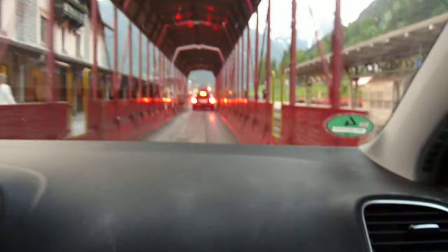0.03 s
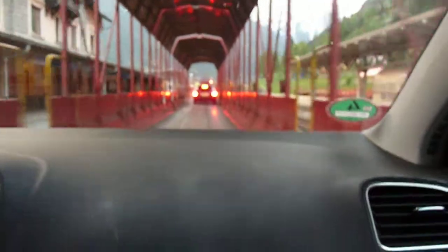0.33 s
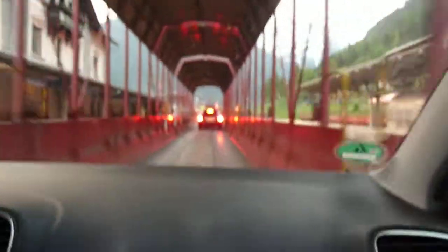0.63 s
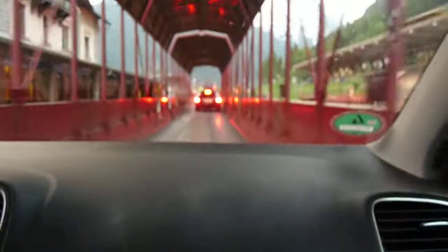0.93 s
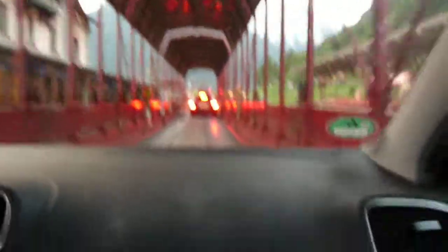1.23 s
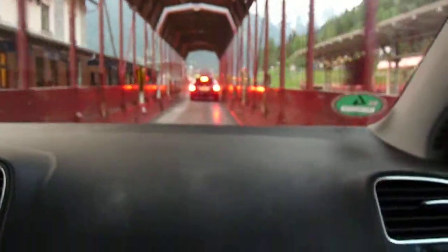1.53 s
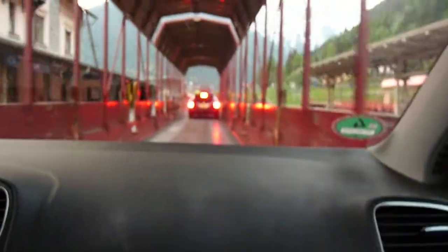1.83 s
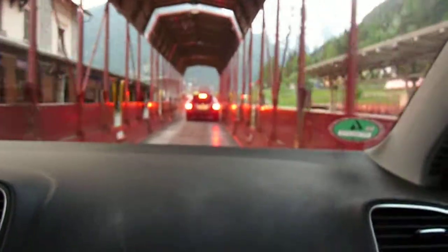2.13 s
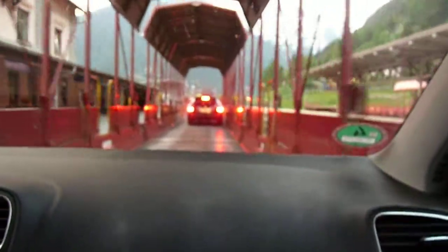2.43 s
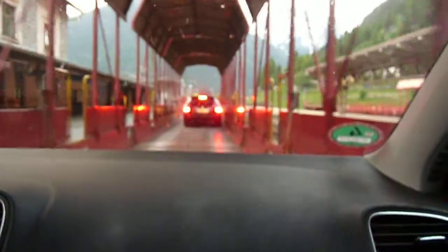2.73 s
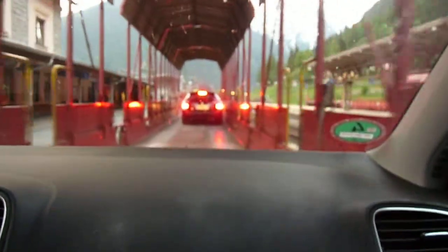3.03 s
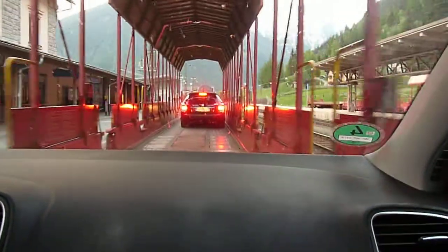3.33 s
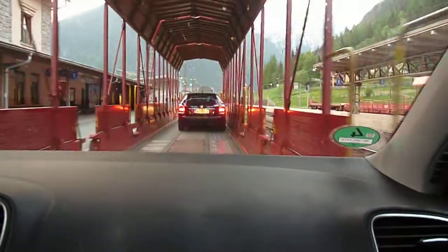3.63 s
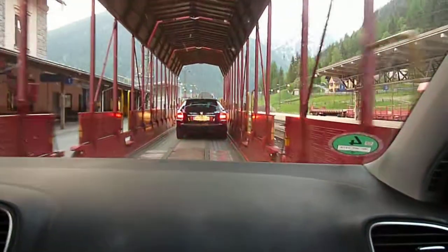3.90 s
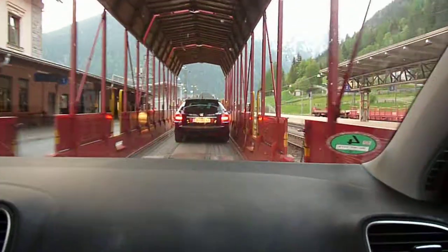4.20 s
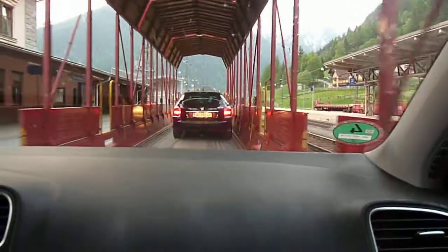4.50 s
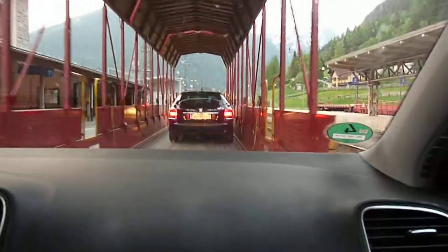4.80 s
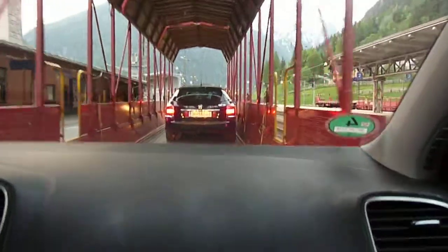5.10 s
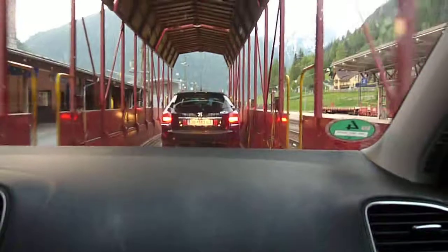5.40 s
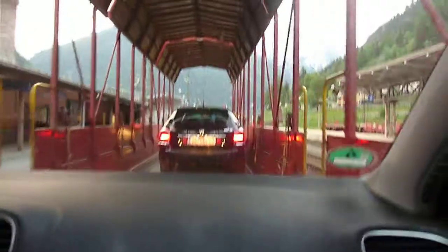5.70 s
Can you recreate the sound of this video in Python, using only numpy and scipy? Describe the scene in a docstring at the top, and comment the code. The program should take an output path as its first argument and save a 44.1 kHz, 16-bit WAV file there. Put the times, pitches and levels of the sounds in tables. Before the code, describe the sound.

A car rolls slowly along the steel deck of a rail wagon, heard from the front seat with the cabin closed. Loose plates clank and the tyres thump over joints at the start. A calmer stretch follows, with low rumble, tyre roar and a muffled engine hum that sinks and briefly booms. Then the clanking and thumping return, along with two hollow underbody knocks and a short, bright jangle.

```python
"""Inside the closed cabin of a car rolling slowly along the steel deck of a car-carrying train.
The uneven deck rocks the body and rumbles through the suspension. The engine sinks in speed and
booms as its firing rate passes the air resonance of the cabin. Tyres thump over the joints and the
underbody knocks. Up front in the mix, loose deck plates clank and chatter, and a fitting jangles."""
import sys
import numpy as np
from scipy import signal
from scipy.fft import rfft, irfft
from scipy.io import wavfile

SR = 44100
rng = np.random.default_rng(int(sys.argv[2]) if len(sys.argv) > 2 else 0)


def wav_record(signal):
    """Record a signal, one row per channel, as 16-bit PCM in the file named by sys.argv[1]."""
    frames = np.transpose(np.atleast_2d(signal))
    bounded = np.clip(frames, -1, 1)
    # unit amplitude maps onto the largest positive 16-bit level
    quanta = np.round(bounded * 32767).astype(np.int16)
    wavfile.write(sys.argv[1], SR, quanta)


N = 253575
TIME = np.arange(N) / SR


def amp(db):
    """Decibels to gain."""
    return 10 ** (np.asarray(db) / 20)


def unit(x):
    """Scales to rms 1."""
    return x / np.sqrt(np.mean(x ** 2) + 1e-20)


def at_level(x, db, size=2000):
    """Sets the rms of the first 45 ms of a blow."""
    return x * amp(db) / np.sqrt(np.mean(x[:size] ** 2) + 1e-20)


def at_hz(points, hz):
    """Reads a table on a log-frequency axis."""
    f, value = np.transpose(points)
    return np.interp(np.log(hz + 1), np.log(f), value)


def curves(rows):
    """Turns timed rows into one automation curve per value column."""
    s, *columns = np.transpose(rows)
    return [np.interp(TIME, s, c) for c in columns]


def add(mix, s, sound):
    """Mixes a sound in at s seconds."""
    part = mix[max(round(s * SR), 0):][:len(sound)]
    part += sound[:len(part)]


def drift(hz):
    """Smooth random modulation of rms 1, rolling off above hz."""
    f = np.fft.rfftfreq(N, 1 / SR)
    return unit(irfft(rfft(rng.standard_normal(N)) * np.exp(-(f / hz) ** 2), N))


def contacts(t, decay_s, per_s, rise_s):
    """A flurry of tiny impacts that swells and dies away."""
    impacts = rng.uniform(-0.96, 1, len(t)) * (rng.random(len(t)) < per_s / SR)
    swell = (1 - np.exp(-t / max(rise_s, .001))) ** 1.5
    return impacts * swell * np.exp(-t / max(decay_s, .003))


def ringing(force, modes, t):
    """Decaying modes, each driven by the force to its own level."""
    out = np.zeros(len(t))
    for hz, db, t60 in modes:
        mode = amp(-60 * t / t60) * np.sin(2 * np.pi * hz * t)
        out += amp(db) * unit(signal.fftconvolve(force, mode)[:len(t)])
    return out


def struck(blows, modes):
    """One part, hit by short flurries, rings in its modes."""
    out, t = np.zeros(N), np.arange(SR // 2) / SR
    for s, db, decay_s in blows:
        force = contacts(t, decay_s, per_s=2600, rise_s=0.0017)
        add(out, s, at_level(ringing(force, modes, t), db))
    return out


# The boxy tone of the cabin. Each row: centre in Hz, width in Hz, boost or cut in dB.
CABIN_RESONANCES = [(50, 14, 3), (300, 35, 3), (385, 80, 6), (530, 60, -2.5), (700, 100, 6.5),
                    (1270, 120, 4.5)]
def in_cabin(x, eq, tilt_db=0, size=8192):
    """Cabin air and panels resonate on top of a source's own EQ, tilted by tilt_db per octave."""
    hz = np.abs(np.fft.fftfreq(size, 1 / SR))
    db = at_hz(eq, hz) + tilt_db * np.log2(np.clip(hz, 30, 5000) / 1000)
    db += sum(lift / (1 + (2 * (hz - f) / width) ** 2) for f, width, lift in CABIN_RESONANCES)
    minimum_phase = np.exp(signal.hilbert(np.log(amp(db))).conj())  # no ring ahead of a hit
    taps = np.fft.ifft(minimum_phase).real
    return signal.fftconvolve(x, taps[:size // 2])[:len(x)]


# Sub-bass swells at steps in the deck. Each row: start in seconds, level at the crest in dB.
SWAYS = [(.04, -30.5), (.62, -37), (1.5, -37), (5.17, -27.5), (5.569, -35)]
# Their deep tone. Each row: frequency in Hz, relative level in dB.
HEAVE_EQ = [(5, -13.5), (18, 0), (32, 1), (50, 0.5), (70, -3), (110, -22), (300, -65)]
def body_heave(bumps, steady_db=-41, crest_s=.065):
    """The body heaves steadily on its springs and sways harder after each step."""
    power = np.full(N, amp(steady_db) ** 2)
    for s, db in SWAYS:
        age = np.maximum(TIME - s, 0) / crest_s
        power += (amp(db) * age * np.exp(1 - age)) ** 2
    return np.sqrt(power) * unit(in_cabin(bumps * rng.standard_normal(N), HEAVE_EQ))


# Deck roughness. Each row: time in seconds, rumble fader in dB, tyre fader in dB.
RIDE_FADERS = [(0.0, -33, -35.5), (0.46, -37, -40), (0.8, -44, -37.5), (1.22, -42, -40),
               (1.55, -39.5, -38.5), (1.86, -37, -41), (2.53, -43.5, -41.5), (2.96, -44.5, -42),
               (3.52, -41, -43), (3.71, -42.5, -32.5), (3.99, -38.5, -37.5), (4.2, -35, -38.5),
               (4.45, -40.5, -37), (4.77, -39.5, -36.5), (5.48, -37.5, -39), (5.75, -39, -32.5)]
# Dark suspension rumble, fuller tyre roar. Each row: frequency in Hz, relative level in dB.
RUMBLE_EQ = [(30, -26.5), (70, -3.5), (115, 1), (160, -0.5), (200, -7), (260, -18.5), (400, -38.5),
             (1000, -68)]
TYRE_EQ = [(80, -18.5), (180, -0.5), (250, -6), (340, 2), (580, -2), (830, -6.5), (1120, -10), (1500, -14),
           (2200, -22), (3100, -27.5), (4200, -37), (8000, -57.5)]
def rolling(rumble_boost_db=5.0, uneven_db=0.86):
    """The bed: the uneven deck heaves the body, shakes the suspension and roars under the tread."""
    rumble_db, tyre_db = curves(RIDE_FADERS)
    bumps = amp(uneven_db * drift(hz=30))
    heave = body_heave(bumps)
    rumble = unit(in_cabin(bumps * rng.standard_normal(N), RUMBLE_EQ))
    roar = unit(in_cabin(bumps * rng.standard_normal(N), TYRE_EQ))
    return heave + amp(rumble_db + rumble_boost_db) * rumble + amp(tyre_db) * roar


# The sinking revs. Each row: time in seconds, firing rate in Hz, effort as a gain in dB.
REVS = [(0, 111.9, 5), (.6, 120, -5), (1.2, 121.6, 1.5), (1.74, 114, -3), (1.88, 109.2, 7),
        (2.08, 111, 1.5), (2.56, 103.5, 3), (2.98, 94.67, 0.5), (3.35, 85.8, -5), (3.55, 81.3, 2.5),
        (4, 74, -3), (5.75, 72.1, -4.5)]
# The muffled hum. Each row: multiple of the firing rate, relative level in dB.
ENGINE_ORDERS = [(.5, -21), (1, 0), (2, -19), (3, -31), (4, -30)]
def engine(waver=0.004, throb_db=2.3, boom_hz=94.4, boom_width_hz=6.44, boom_db=-23.5):
    """A wavering hum that booms as the firing rate crosses the cabin's air resonance."""
    hz, effort_db = curves(REVS)
    firings = np.cumsum(hz * (1 + waver * drift(hz=12))) / SR
    hum = sum(amp(db) * np.sin(2 * np.pi * (k * firings + rng.random())) for k, db in ENGINE_ORDERS)
    boom = amp(boom_db) / np.hypot(1, 2 * (hz - boom_hz) / boom_width_hz)
    return unit(hum) * boom * amp(effort_db + throb_db * drift(hz=36))


# Bright jangles. Each row: start in seconds, level in dB, chatter decay in seconds.
JANGLES = [(4.54, -48, 0.021), (4.558, -43.5, .025), (4.625, -52, 0.012)]
# The fitting's ring. Each row: pitch in Hz, relative level in dB, t60 in seconds.
FITTING_MODES = [(2150, 6, .09), (2513, 17, 0.075), (2905, 6, 0.13), (3070, 15.5, 0.082), (3260, 4.5, 0.15),
                 (3500, -4, 0.17), (4730, -23, .05), (5730, -24, .04), (6250, -27, 0.037)]
def fitting_jangles():
    """A loose steel fitting jangles when its plate drops."""
    return struck(JANGLES, FITTING_MODES)


# Hollow knocks. Each row: start in seconds, level in dB, chatter decay in seconds.
KNOCKS = [(3.72, -30, 0.023), (3.956, -30, 0.018)]
# The underbody's ring. Each row: pitch in Hz, relative level in dB, t60 in seconds.
UNDERBODY_MODES = [(366, 0.5, 0.13), (417.5, -2.5, 0.21)]
def underbody_knocks():
    """Short blows ring two low modes of the underbody."""
    return struck(KNOCKS, UNDERBODY_MODES)


# The wagon's metallic tail. Each row: frequency in Hz, t60 in seconds.
STEEL_T60 = [(200, 0.24), (1000, 0.41), (2500, 0.47), (6000, 0.33)]
def steelwork(force):
    """A force rings countless close modes of the wagon: noise whose bands die at their own speed."""
    size = len(force)
    hz, age, bands = signal.stft(rng.standard_normal(size), SR, nperseg=256)
    decay = amp(-60 * age / at_hz(STEEL_T60, hz)[:, None])
    ring = signal.istft(bands * decay, SR, nperseg=256)[1][:size]
    return signal.fftconvolve(force, ring / np.linalg.norm(ring))[:size]


# Tyres hitting joints. Each row: start in seconds, level in dB, tilt towards the bass in dB per
# octave, level change per hop in dB.
THUMPS = [(.118, -22.5, -1.5, -4), (.66, -22.5, -1, -4), (.935, -32, 0.5, -14), (1.206, -33, -3, -14.5),
          (1.44, -40, -0.5, 1), (3.745, -31, -4, -4), (3.955, -35, -3, 0.5), (4.568, -33, -4.5, -17),
          (4.674, -30.5, 3, -5), (4.787, -27.5, -2.5, -8), (5.092, -28.5, 2.5, -0.5),
          (5.499, -28, 0.5, -0.5), (5.664, -30, -1.5, -4.5)]
# Their dull weight. Each row: frequency in Hz, relative level in dB.
THUMP_EQ = [(20, -15), (60, -7.5), (130, 6.5), (190, 1.5), (250, -8), (350, -6), (470, -4.5), (580, -10.5),
            (850, -17.5), (1200, -37), (2500, -51), (6000, -82.5)]
def tyre_thumps(blows=3, hop_s=.059, tread_decay_s=0.033):
    """The wheel hops at a joint; each blow comes up through the suspension and the deck drums on."""
    out, t = np.zeros(N), np.arange(SR // 2) / SR
    for s, db, weight_db, hop_db in THUMPS:
        for hop in range(blows):
            force = contacts(t, tread_decay_s, per_s=4400, rise_s=0.0036)
            thump = in_cabin(force + steelwork(force), THUMP_EQ, -weight_db)
            add(out, s + hop * hop_s, at_level(thump, db + hop * hop_db))
    return out


# A deck plate's ring. Each row: pitch in Hz, relative level in dB, t60 in seconds.
PLATE_MODES = [(1032, 1.5, 0.27), (1353, 6.5, 0.46), (1264, 11.5, 0.46), (1566, -0.5, 0.11),
               (1618, 0.5, 0.88), (1710, -8.5, 0.28), (1990, -6.5, 0.33), (2123, 5, 0.56),
               (2466, -5.5, 0.13), (2470, -2, 0.22), (2890, -4, 0.52), (2970, -9.5, 0.45),
               (3070, -13.5, .4), (3340, -15, .35), (4300, -15, 0.3)]
# The crash as it reaches the cabin. Each row: frequency in Hz, relative level in dB.
CLANK_EQ = [(60, -23.5), (200, 2.5), (450, 5.5), (700, 4), (980, 3), (1150, -2), (1600, -2), (2000, -6),
            (2300, -10), (3200, -15.5), (4000, -23.5), (5000, -36), (6500, -58), (9000, -57.5)]
def plate_hit(db, bright_db, rise_s, chatter_s, wagon_db=2.0, ring_db=-15.0, settle_db=-24.5):
    """A plate chatters on its seat and rattles to rest, ringing and shaking the wagon."""
    t = np.arange(SR * 2 // 3) / SR
    chatter = contacts(t, chatter_s, per_s=3500, rise_s=rise_s)
    settle = contacts(t, decay_s=0.096, per_s=2900, rise_s=rise_s)
    force = chatter + amp(settle_db) * settle
    crash = in_cabin(force + amp(wagon_db) * steelwork(force), CLANK_EQ, bright_db)
    ring = ringing(force, PLATE_MODES, t)
    return at_level(crash, db) + at_level(ring, db + ring_db)


# Double clanks. Each row: start in seconds, slap level in dB, fall-back level in dB, air time in
# seconds, slap attack in seconds, slap brightness in dB per octave.
CLANKS = [(.063, -28.5, -39, .056, 0.0064, 1), (.186, -47, -53, 0.048, 0.0033, 1.5),
          (.328, -44, -44.5, .032, 0.012, -0.5), (.497, -49.5, -58, 0.042, 0.0037, 2),
          (.660, -40, -30, 0.068, 0.0063, 1.7), (.925, -38, -47, 0.1, 0.0043, 2),
          (1.358, -47, -42.5, 0.048, 0.014, 0.9), (1.578, -42.5, -51, 0.049, .004, 1.8),
          (3.510, -29, -31.5, .038, 0.022, 1.6), (3.865, -44.5, -54, 0.036, 0.018, 2.5),
          (4.064, -37, -37, .06, 0.019, 2.5), (4.319, -33.5, -33.5, .028, 0.032, 0.8),
          (4.555, -29.5, -49, 0.067, 0.0039, .5), (4.76, -42, -45, 0.038, 0.0068, 1),
          (4.955, -38, -35.5, 0.061, 0.015, 2.7), (5.195, -45, -44.5, .09, .01, 2.9),
          (5.481, -31.5, -33.5, 0.043, 0.063, 0.3)]
def plate_clanks(slap_chatter_s=0.017, max_fall_chatter_s=0.071, clean_fall_s=0.037):
    """A wheel tips a loose plate: it slaps down, then falls back brighter and with a faster attack."""
    out = np.zeros(N)
    for s, slap_db, fall_db, air_s, rise_s, bright_db in CLANKS:
        add(out, s, plate_hit(slap_db, bright_db, rise_s, slap_chatter_s))
        chatter_s = max_fall_chatter_s * np.exp(-air_s / clean_fall_s)  # longer aloft, cleaner landing
        add(out, s + air_s, plate_hit(fall_db, bright_db + 0.6, rise_s * 0.6, chatter_s))
    return out


def scene():
    """The mono mix, heard from the front seat."""
    deck = plate_clanks() + fitting_jangles()
    car = tyre_thumps() + rolling() + engine() + underbody_knocks()
    return (deck + car)[None]


# A faint, airy noise floor. Each row: frequency in Hz, relative level in dB.
HISS_EQ = [(100, -2.5), (3000, 0.5), (6000, 3.5), (7500, 2.5), (8200, -7), (9000, -12)]
def record(dry):
    """The level dips briefly; a small camera adds hiss and a thin whine, then cuts the top end."""
    dip_at_s, dip_half_width_s, dip_db = .182, .0025, -16
    hiss_db, whine_db, whine_hz = -69.5, -84.5, 6667
    dip = amp(dip_db * np.exp(-((TIME - dip_at_s) / dip_half_width_s) ** 2))
    hiss = amp(hiss_db) * unit(in_cabin(rng.standard_normal(N), HISS_EQ))
    whine = amp(whine_db) * unit(np.sin(2 * np.pi * whine_hz * TIME))
    lowpass = signal.firwin(301, cutoff=8450, window=("kaiser", 9), fs=SR)
    return signal.oaconvolve(dry * dip + hiss + whine, lowpass[None], "same")


dry = scene()
out = record(dry)
wav_record(out)
```